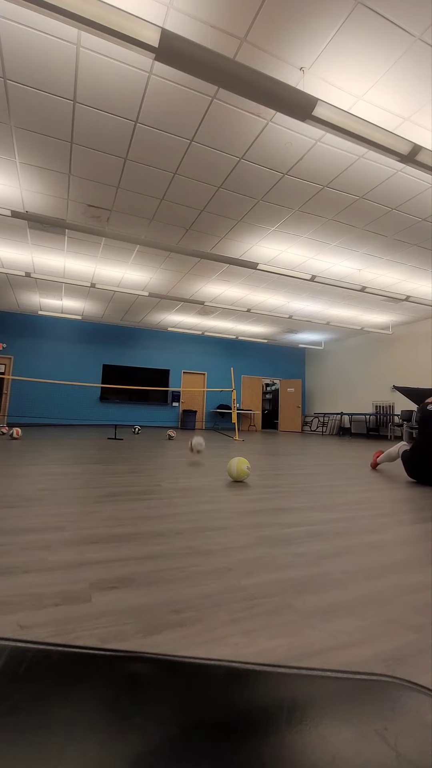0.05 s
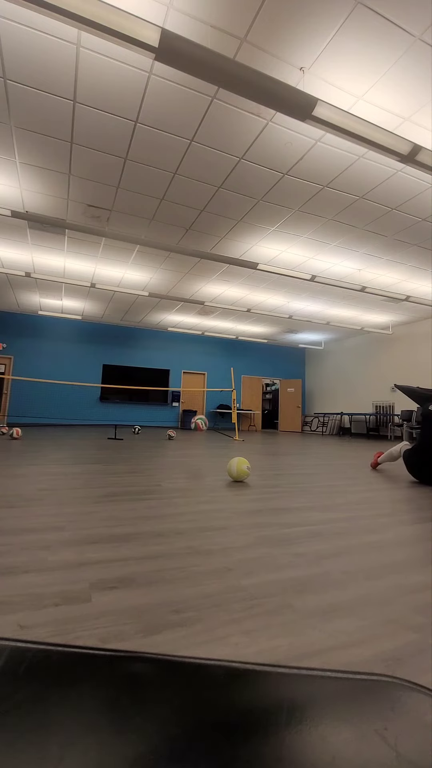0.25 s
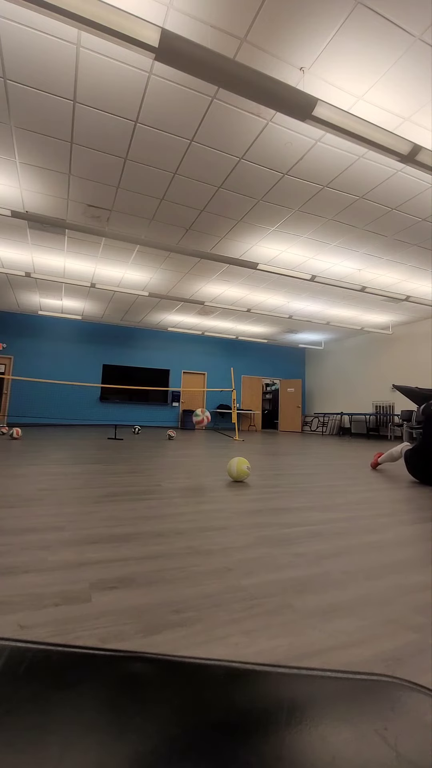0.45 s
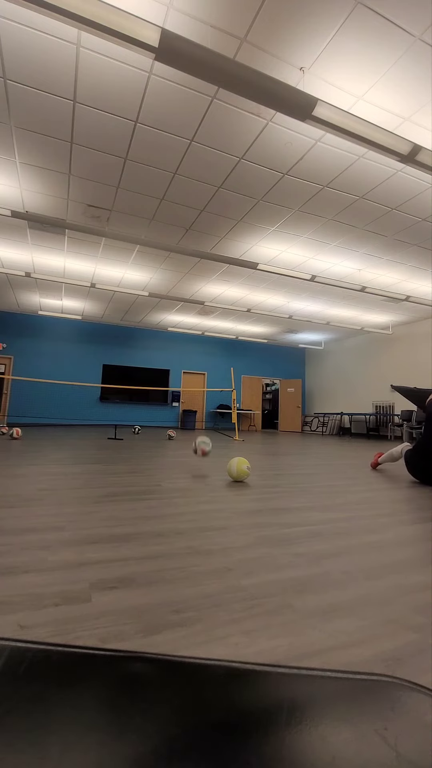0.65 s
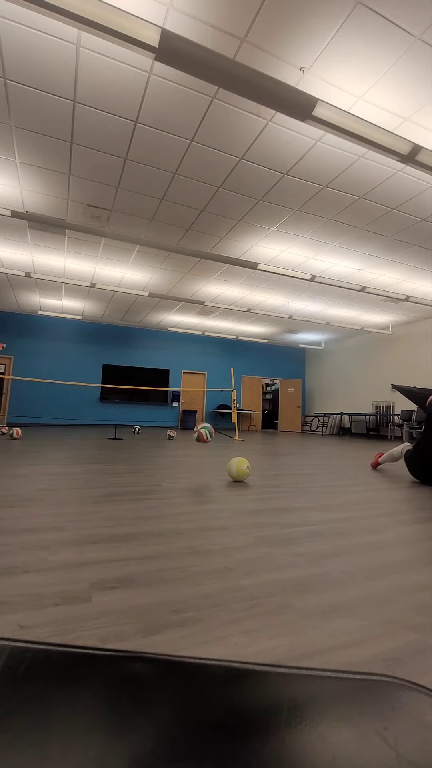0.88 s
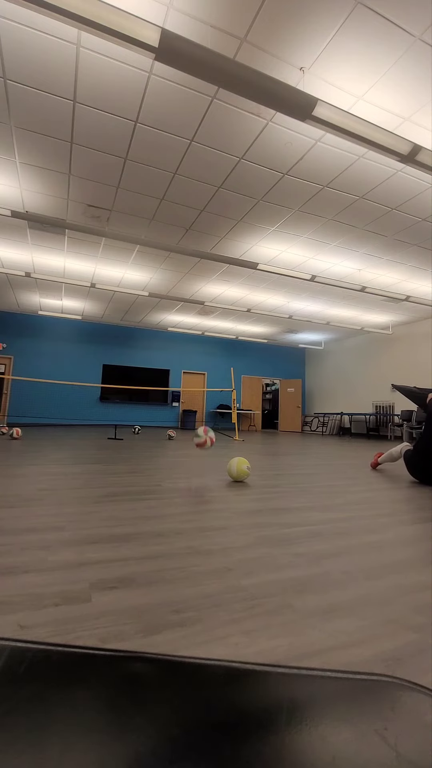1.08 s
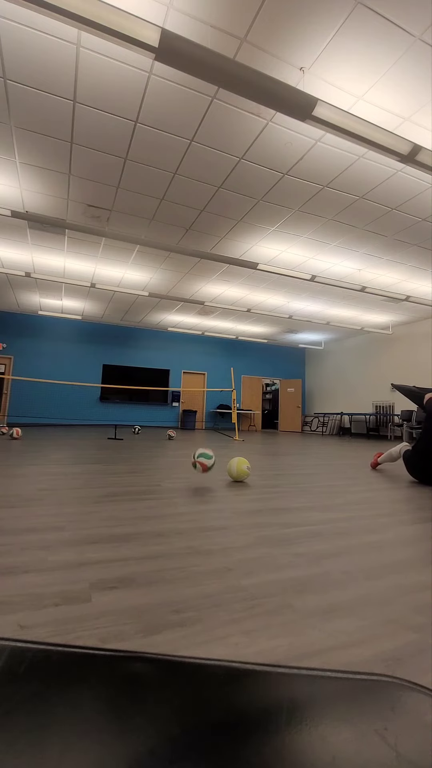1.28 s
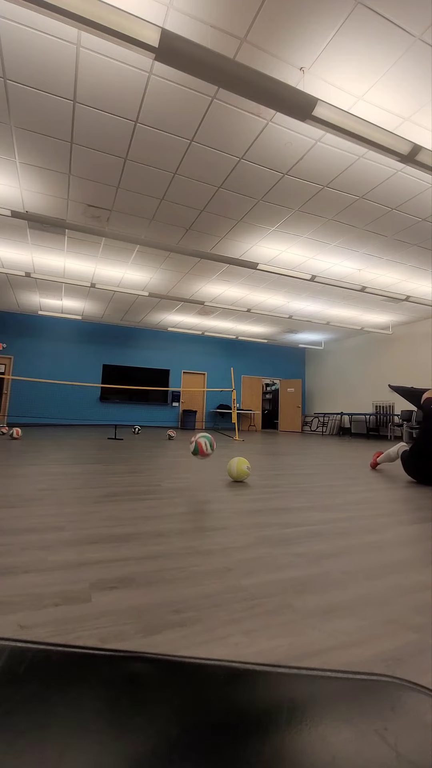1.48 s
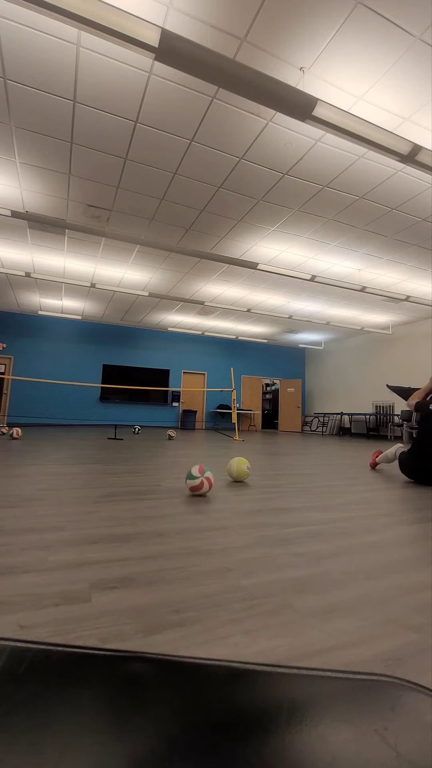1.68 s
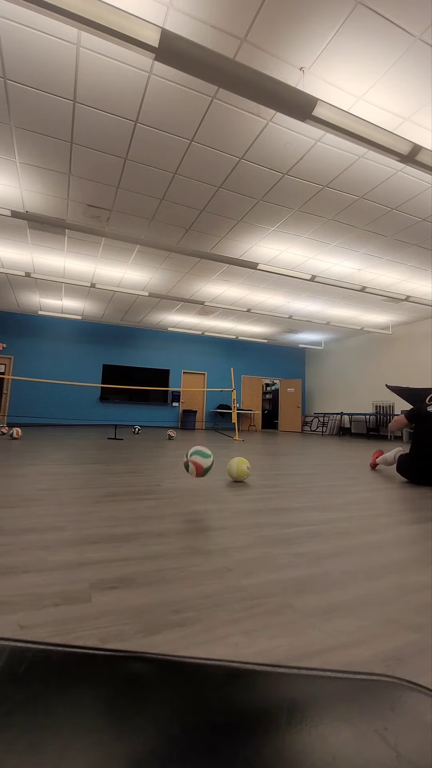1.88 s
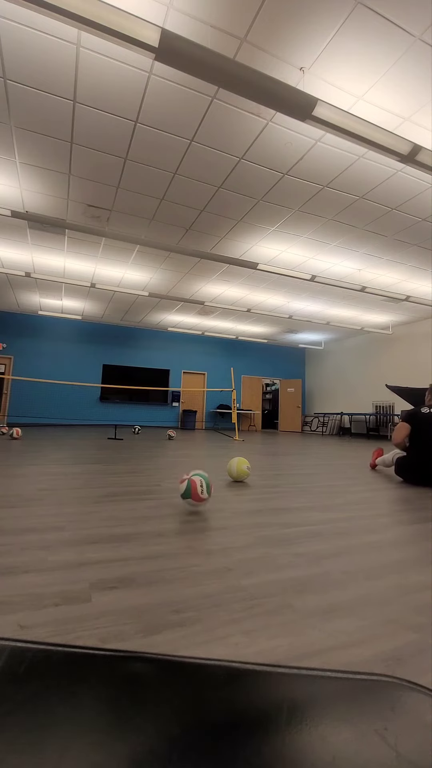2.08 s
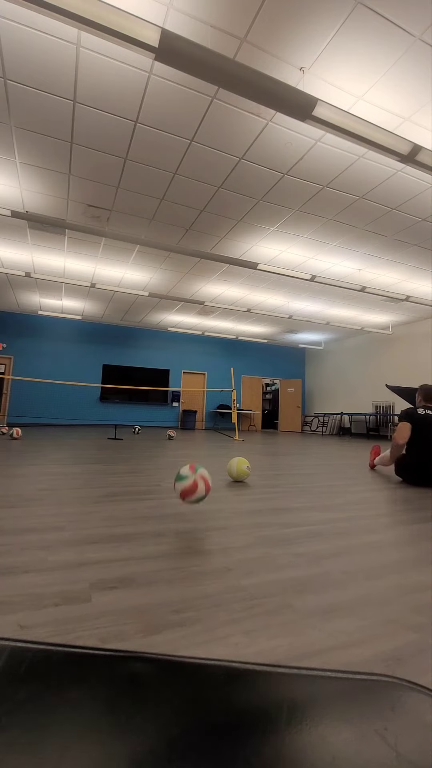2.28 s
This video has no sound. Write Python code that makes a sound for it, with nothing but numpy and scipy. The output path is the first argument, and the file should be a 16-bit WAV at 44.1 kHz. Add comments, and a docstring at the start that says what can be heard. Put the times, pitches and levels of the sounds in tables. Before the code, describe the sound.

A volleyball bounces on a hard floor in a wide hall, each hit a low thud with a sharp slap and a short echo. The strongest bounces land at about 0.2 and 0.8 seconds, then softer, quicker ones follow at 1.3, 1.8 and 2.2 seconds. Clothes rustle faintly near the low microphone, mostly around 2 seconds, and a quiet ventilation rumble runs underneath.

```python
"""A volleyball bounces five times across a hard floor towards a microphone lying low in a wide hall.
Each impact excites damped vibrations: a thump of the squashed ball, the modes of its shell and of the
floor, and a snap of its skin. The low ceiling reflects the sound at once, and the hall reverberates.
Clothes rustle nearby over a faint ventilation rumble."""
import sys
import numpy as np
from scipy import signal
from scipy.fft import rfft, irfft, next_fast_len
from scipy.io import wavfile
from scipy.ndimage import uniform_filter1d

SR = 44100
rng = np.random.default_rng(int(sys.argv[2]) if len(sys.argv) > 2 else 0)


def waveform_to_disk(signal):
    """Save audio, clipped to [-1, 1], as 16-bit WAV at the path in sys.argv[1]."""
    frames = np.transpose(np.atleast_2d(signal))
    scaled = np.clip(frames, -1, 1) * 32767
    samples = np.round(scaled).astype(np.int16)
    wavfile.write(sys.argv[1], SR, samples)


N = 108045
T = np.arange(N) / SR

# Each row: start in seconds; thump, shell, snap and treble bite in dB; shell ping in Hz; bulge in Hz;
# bulge in dB; ceiling delay in seconds; boxy hall ring in dB; hall gain in dB.
BOUNCES = [(0.1997, -23.5, -28, -37, 1, 1490, 230, -24.5, 0.0092, -1, 5.5),
           (0.8212, -23.5, -27, -37, 3, 1870, 241, -30, .0103, -1, 2),
           (1.3471, -28, -27, -40.5, 5, 1520, 292, -42, 0.01, 0, -1),
           (1.795, -31.5, -29.5, -41.5, 0, 1640, 345, -50.5, .0108, 4.5, 0),
           (2.1712, -31, -34.5, -42.5, -4.5, 1410, 323, -39, .0111, 5.5, -3)]
# Modes of shell and enclosed air. Each row: frequency in Hz, relative level in dB, T60 in seconds.
SHELL_MODES = [(371.7, -12, 0.061), (502, -21, 0.053), (763, -24.5, 0.075), (942, -15.5, 0.041),
               (1080, -14, 0.018), (1227, -15.5, 0.028), (1400, -12.5, 0.021), (1632, -13, 0.035),
               (1860, -16.5, 0.028), (1980, -15, 0.016)]
# Modes of the floor. Each row: frequency in Hz, level against the thump in dB, T60 in seconds.
FLOOR_MODES = [(79.48, -7.5, 0.43), (95.9, -23, 1), (120.3, -58.5, .4), (224.7, -15.5, 0.54),
               (345, -36.5, 0.34)]
# Spectra of skin, hall, cloth and ventilation. Each row: frequency in Hz, relative density in dB.
SNAP_SPECTRUM = [(300, -41), (1000, 13), (1800, 13), (2400, -3.5), (3500, 0.5), (5500, 3.5), (7500, 0.5),
                 (8600, -7.5), (11300, 7), (13500, -5), (16000, -7)]
HALL_SPECTRUM = [(30, -10.5), (55, -11.5), (75, -5), (100, 3.5), (135, 3.5), (175, -16.5), (230, -5.5),
                 (300, -16), (380, -9.5), (500, -23.5), (700, -16.5), (1000, -19.5), (1800, -21.5),
                 (2600, -29), (4000, -31), (5500, -31), (7500, -32.5), (8700, -39.5), (11000, -27),
                 (13500, -34.5), (16000, -51)]
CLOTH_SPECTRUM = [(500, -8), (2000, 1), (3500, -10.5), (5000, -3), (7600, 2), (8600, -7.5), (11300, 4.5),
                  (13500, -2.5), (16000, -11)]
VENT_SPECTRUM = [(20, -14), (35, -13), (58, 7), (72, 0), (100, -4), (125, -10.5), (185, -19), (260, -17.5),
                 (380, -32), (600, -41), (1500, -40.5), (4700, -49), (16000, -45.5)]
# Reverberation time. Each row: frequency in Hz, T60 in seconds.
HALL_T60 = [(60, 0.92), (120, 0.87), (250, 0.82), (400, 0.75), (600, 0.62), (1000, 0.66), (1800, 0.64),
            (4000, 0.71), (7500, 0.75), (11000, 0.54), (15000, 0.45)]
# Swishes of cloth. Each row: start, rise time and start of release in seconds, level in dB.
RUSTLES = [(0.578, 0.084, 0.74, -65.5), (1.54, 0.014, 1.647, -68), (1.873, 0.004, 1.915, -55),
           (1.93, 0.027, 2.0, -91), (2.06, 0.0028, 2.075, -61.5), (2.09, 0.019, 2.15, -70.5),
           (2.418, 0.01, 2.45, -69.5)]
# Ticks in the cloth. Each row: start in seconds, level in dB.
CLOTH_TICKS = [(1.886, -49), (1.911, -53), (2.060, -56), (2.068, -57), (2.086, -56)]
# Acoustic shadow at the microphone's right port. Each row: frequency in Hz, gain against the left in dB.
RIGHT_SHADOW = [(30, 7.5), (80, 3), (180, -2.5), (330, 4), (700, -2.5), (1400, -7.5), (2800, -14),
                (5600, -13.5), (10000, -8), (14000, -15)]
# Coherence of the diffuse field. Each row: frequency in Hz, left-right correlation.
COHERENCE = [(30, 0.51), (80, 0.94), (200, 0.95), (400, 0.8), (800, 0.96), (1600, 0.099), (4000, 0),
             (16000, 0)]


def ball():
    """Image sources: each impact arrives directly, off the ceiling, then off floor and ceiling again."""
    out, t = np.zeros((2, N)), T[:3 * SR // 4]
    ping_t60_s, bulge_t60_s = 0.016, 0.053
    echo_rise_s, echo_smear_s, second_delay_ratio = 0.0008, 0.0033, 2.46
    for start, thump_db, shell_db, snap_db, bite_db, ping_hz, bulge_hz, bulge_db, echo_s, *_ in BOUNCES:
        shell = -from_db(shell_db) * (shell_modes(t) + from_db(-3.5) * ring(t, ping_hz, ping_t60_s))
        bulge = from_db(bulge_db) * ring(t, bulge_hz, bulge_t60_s)   # the ball's slowest change of shape
        body = from_db(thump_db) * thump(t) - bulge
        floor = sum(from_db(thump_db + db) * ring(t, hz, t60) for hz, db, t60 in FLOOR_MODES)
        snap, crack, crackle = skin_snap(t, snap_db, bite_db)
        echo = (from_db(2) * body + shell) * (1 - np.exp(-t / echo_rise_s)) + from_db(-11.5) * crack
        scattered = crackle * np.exp(-t / echo_smear_s)
        # the offset cancels the lag in scene(): ceiling echoes reach both ports at almost the same time
        for port, offset_s in enumerate([0, 0.0003]):
            first_echo = echo + from_db(1) * scattered[port]
            second_echo = from_db(-18.5) * echo + from_db(-11) * scattered[port + 2]
            add(out[port], body + shell + snap + floor, start)
            add(out[port], first_echo, start + echo_s - offset_s)
            add(out[port], second_echo, start + second_delay_ratio * echo_s - offset_s)
    return out


def thump(t):
    """Monopole radiation: the ball's volume shrinks and springs back, giving suction, push, suction."""
    hz, decay_s, lead_s = 119.7, 0.0095, 0.0014
    return -np.cos(2 * np.pi * hz * (t + lead_s)) * np.exp(-t / decay_s)


def shell_modes(t):
    """Modal superposition: shell and air modes add in alternating sign, varying in level at each hit."""
    return sum((-1) ** k * from_db(db + rng.normal(0, 1.5)) * ring(t, hz, t60)
               for k, (hz, db, t60) in enumerate(SHELL_MODES))


def skin_snap(t, snap_db, bite_db):
    """Brief contact is broadband: the skin clicks at first touch and crackles while pressed flat."""
    crackle_s = 0.0041
    crackle = from_db(snap_db) * coloured(rng.standard_normal((5, len(t))), SNAP_SPECTRUM)
    crackle = filtered(crackle, lambda hz: from_db(bite_db * bite(hz)))
    touch = -from_db(snap_db + 18.5) * (t == t[10])
    crack = filtered(touch, lambda hz: from_db(at_hz(SNAP_SPECTRUM, hz) + bite_db * bite(hz)))
    snap = crackle[0] * np.exp(-(t / crackle_s) ** 2) + crack
    return snap, crack, crackle[1:]   # the click and four independent noises feed the echoes


def bite(hz):
    """Spectral weighting: the treble region that makes a bounce sharp or dull."""
    return bump(hz, 2600, octaves=1)


def upper_resonances(x):
    """High modal density: the ball's many small resonances leave irregular treble peaks and dips."""
    spacing_hz, lowest_hz, spread_db = 79.7, 1400, 1.96
    grid = np.arange(400) * spacing_hz
    ripple_db = spread_db * rng.standard_normal(len(grid)) * (grid > lowest_hz)
    return filtered(x, lambda hz: from_db(np.interp(hz, grid, ripple_db)))


def hall():
    """Reverberation: the bounces add in power, and each band decays exponentially at its own rate."""
    delay_s, build_s, early_decay_s = 0.0037, 0.025, 0.025
    out, t = np.zeros((2, N)), T[:SR + SR // 4]
    fields = [flutter(diffuse()), flutter(diffuse())]
    edges_hz = np.geomspace(28, 17000, 33)
    early_reflections = from_db(-0.5) * np.exp(-t / early_decay_s)
    onset = (1 - np.exp(-t / build_s)) * (1 + early_reflections)
    for k, (low, high) in enumerate(zip(edges_hz, edges_hz[1:])):
        hz, power = np.sqrt(low * high), np.zeros(N)
        tail_power = (onset * from_db(-60 * t / at_hz(HALL_T60, hz))) ** 2
        for start, thump_db, shell_db, snap_db, bite_db, ping_hz, *_, boxy_db, hall_db in BOUNCES:
            drive_db = at_hz([(200, thump_db - 1.5), (1200, shell_db + 1), (3500, snap_db + 11.5)], hz)
            drive_db += bite_db * bite(hz) + boxy_db * bump(hz, 370, octaves=0.35)
            drive_db += 3 * bump(hz, ping_hz, octaves=0.067)   # the shell's pitch lingers
            add(power, from_db(drive_db + hall_db) ** 2 * tail_power, start + delay_s)
        band = signal.sosfilt(signal.butter(2, [low, high], "band", fs=SR, output="sos"), fields[k % 2])
        out += band * np.sqrt(power) * from_db(at_hz(HALL_SPECTRUM, hz) + 10)
    return out


def flutter(x):
    """Comb filtering: repeated trips between floor and ceiling favour evenly spaced frequencies."""
    trip_s, share, damping_hz = 0.0108, 0.19, 2920
    return filtered(x, lambda hz: 1 / (1 - share * np.exp(-hz / damping_hz - 2j * np.pi * hz * trip_s)))


def clothes():
    """Friction noise: someone sitting nearby shifts, making grainy swishes of cloth and a few ticks."""
    release_s, tick_decay_s, grain_s, grain_db = 0.065, 0.0019, 0.0054, 1.5
    swishes = sum(from_db(db) * (1 - np.exp(-np.maximum(T - start, 0) / rise))
                  * np.exp(-np.maximum(T - end, 0) / release_s) for start, rise, end, db in RUSTLES)
    ticks = sum(from_db(db) * (T > s) * np.exp(-np.abs(T - s) / tick_decay_s) for s, db in CLOTH_TICKS)
    grain = rms_one(uniform_filter1d(rng.standard_normal(N), int(grain_s * SR)))
    return (swishes + ticks) * from_db(grain_db * grain) * coloured(diffuse(), CLOTH_SPECTRUM)


def ventilation():
    """Stationary noise: a diffuse low rumble with a faint hiss."""
    return from_db(-60) * coloured(diffuse(), VENT_SPECTRUM)


def diffuse():
    """Spatial coherence: white noise at two ports, alike in the bass and unrelated in the treble."""
    mid, side = rng.standard_normal((2, N))
    mid = filtered(mid, lambda hz: np.sqrt(1 + at_hz(COHERENCE, hz)))
    side = filtered(side, lambda hz: np.sqrt(1 - at_hz(COHERENCE, hz)))
    return np.array([mid + side, mid - side])


def ring(t, hz, t60):
    """Damped oscillation: one struck mode, falling 60 dB in t60 seconds."""
    return np.sin(2 * np.pi * hz * t) * from_db(-60 * t / t60)


def from_db(db):
    """Amplitude ratio of a level in decibels."""
    return 10 ** (np.asarray(db) / 20)


def rms_one(x):
    """Normalisation to unit rms."""
    return x / np.sqrt(np.mean(x ** 2) + 1e-20)


def at_hz(points, hz):
    """Interpolation of a table on a log-frequency axis."""
    frequencies, values = np.transpose(points)
    return np.interp(np.log(hz), np.log(frequencies), values)


def bump(hz, centre_hz, octaves):
    """Gaussian of height 1 on a log-frequency axis."""
    return np.exp(-(np.log2(hz / centre_hz) / octaves) ** 2)


def filtered(x, response):
    """Linear filtering: the spectrum is multiplied by a frequency response."""
    size = next_fast_len(x.shape[-1] + SR // 10)
    hz = np.maximum(np.arange(size // 2 + 1) * SR / size, 1)
    return irfft(rfft(x, size) * response(hz), size)[..., :x.shape[-1]]


def coloured(white, spectrum):
    """Spectral shaping of white noise, at unit rms."""
    return rms_one(filtered(white, lambda hz: from_db(at_hz(spectrum, hz))))


def add(out, x, start_s):
    """Superposition of x on out from a given time."""
    i = int(start_s * SR)
    out[i:i + len(x)] += x[:max(N - i, 0)]


def scene():
    """Path difference and shadowing: direct sound, hall and cloth are later and duller on the right."""
    lag_s = 0.000313
    bounces, rustle, rumble = ball() + hall(), clothes(), ventilation()
    left, right = upper_resonances(bounces) + rustle
    right = filtered(right,
                     lambda hz: from_db(at_hz(RIGHT_SHADOW, hz)) * np.exp(-2j * np.pi * hz * lag_s))
    return np.array([left, right]) + rumble


def record(dry):
    """Band limiting: the deepest bass and the highest treble are cut."""
    low_cut_hz, high_cut_hz = 38, 16000
    dry = signal.sosfilt(signal.butter(3, low_cut_hz, "high", fs=SR, output="sos"), dry)
    return signal.sosfilt(signal.ellip(10, 0.2, 80, high_cut_hz, fs=SR, output="sos"), dry)


dry = scene()
out = record(dry)
waveform_to_disk(out)
```